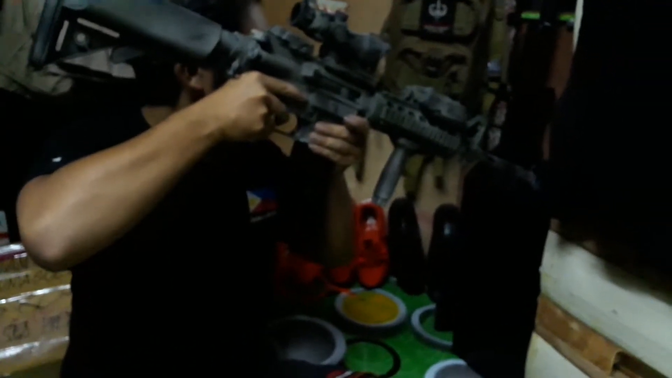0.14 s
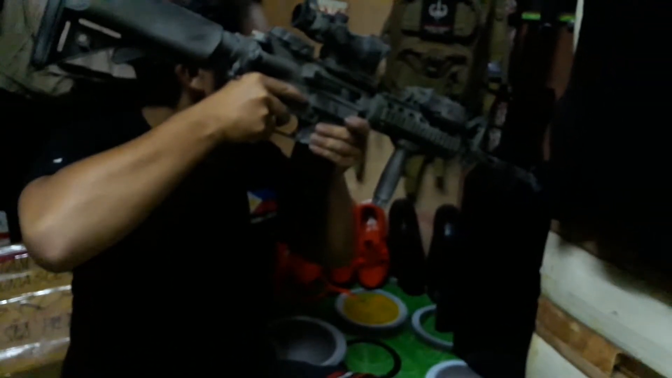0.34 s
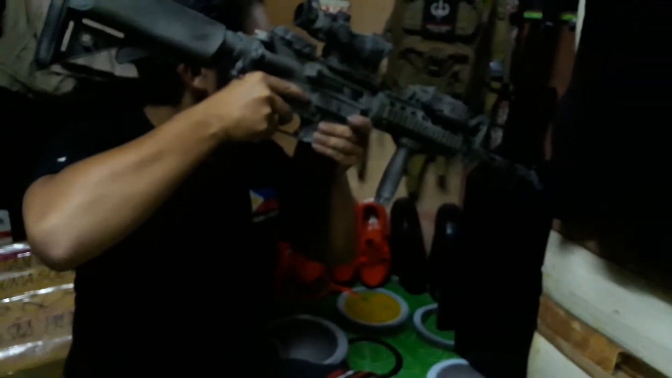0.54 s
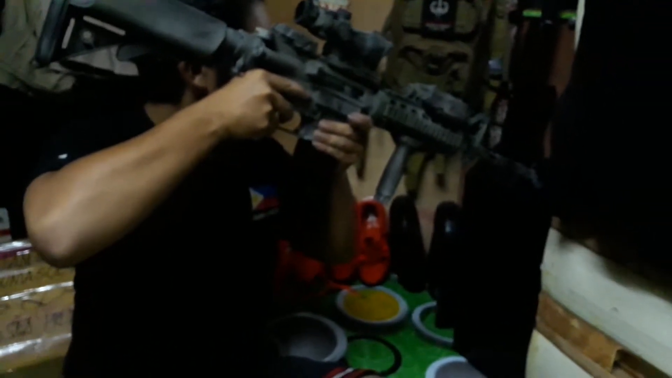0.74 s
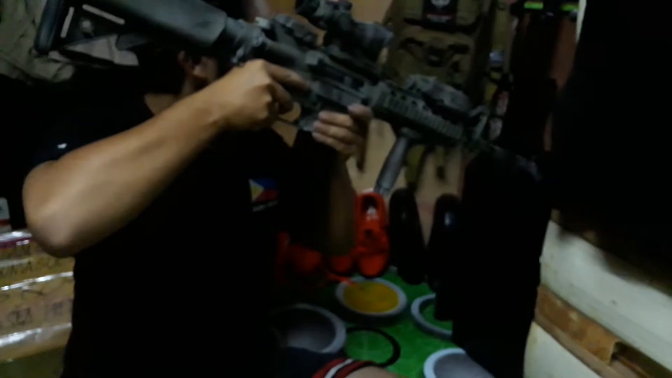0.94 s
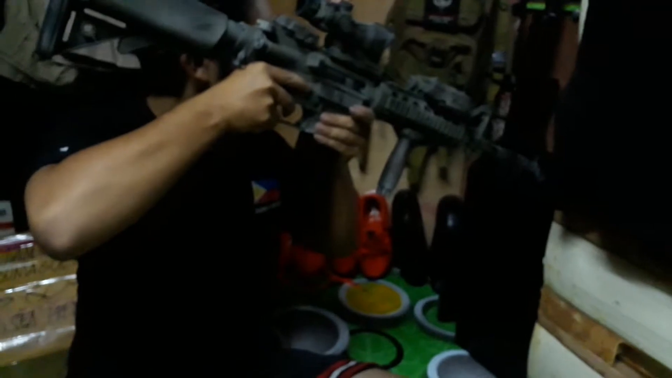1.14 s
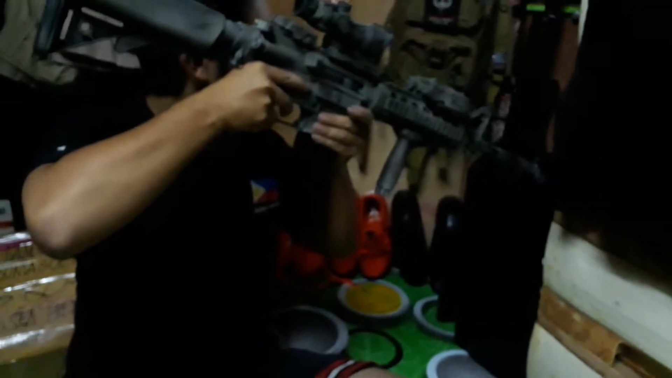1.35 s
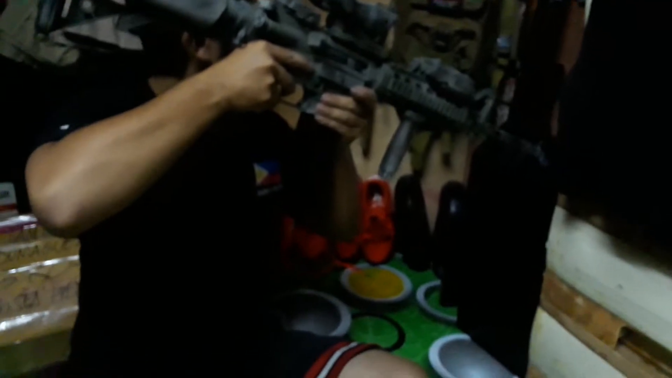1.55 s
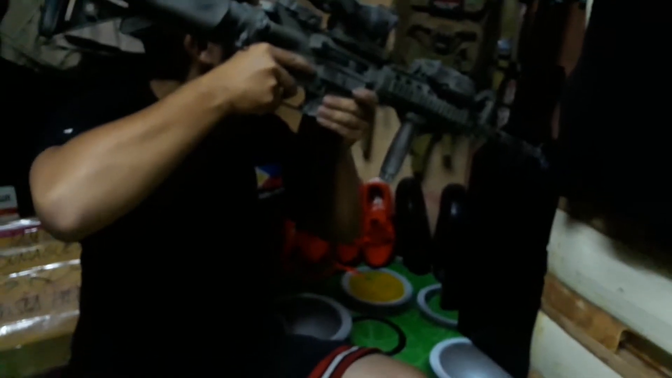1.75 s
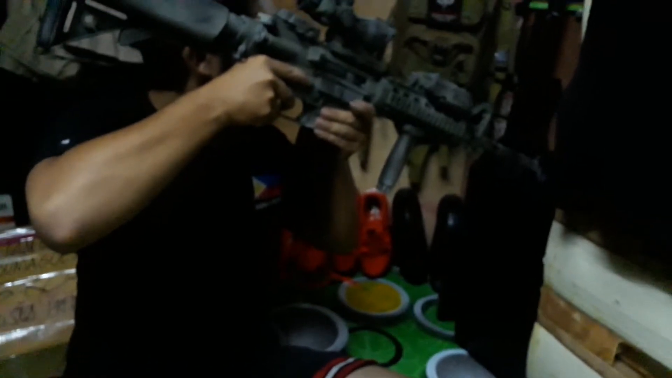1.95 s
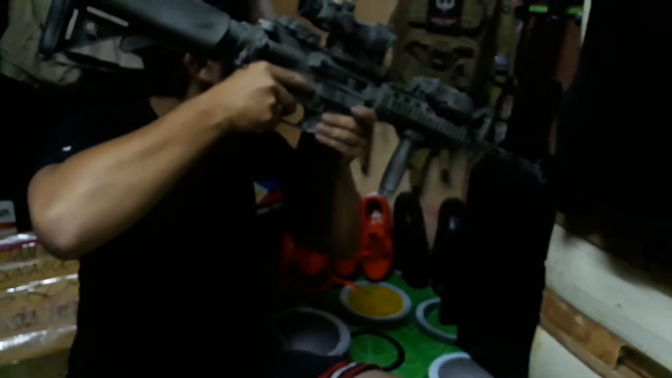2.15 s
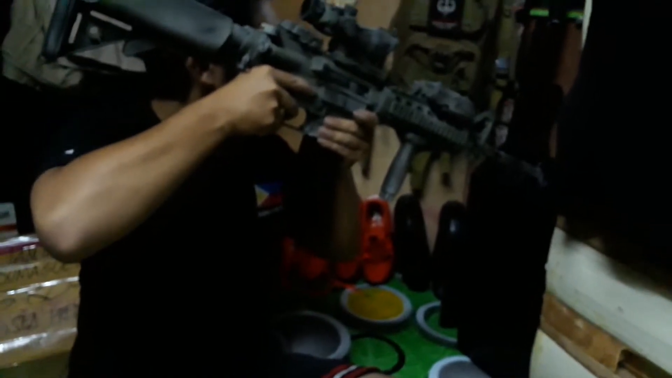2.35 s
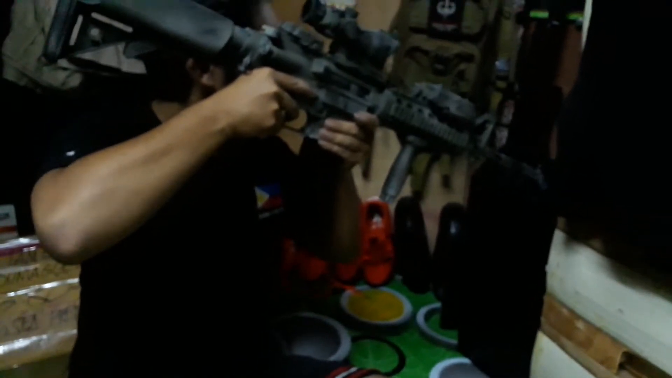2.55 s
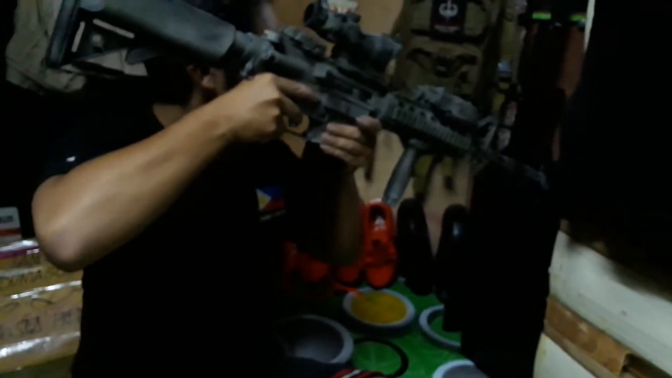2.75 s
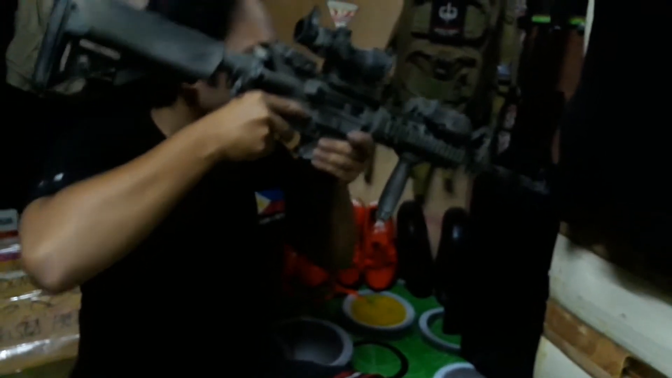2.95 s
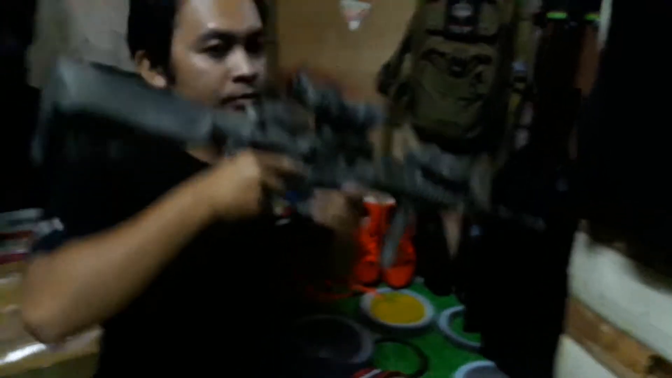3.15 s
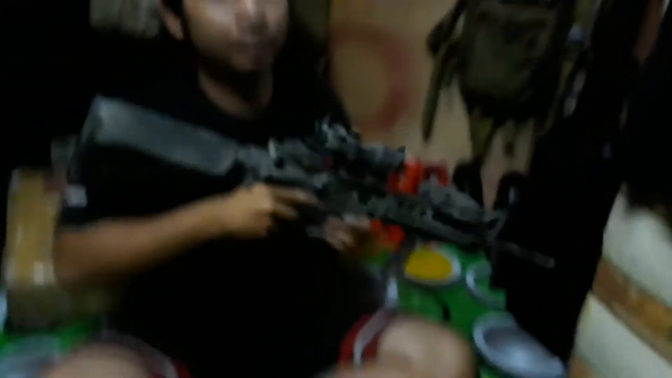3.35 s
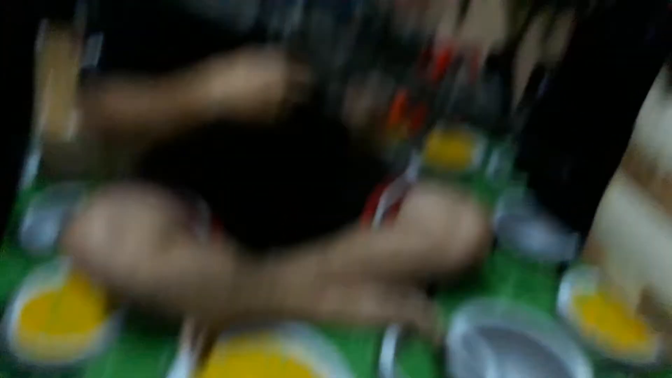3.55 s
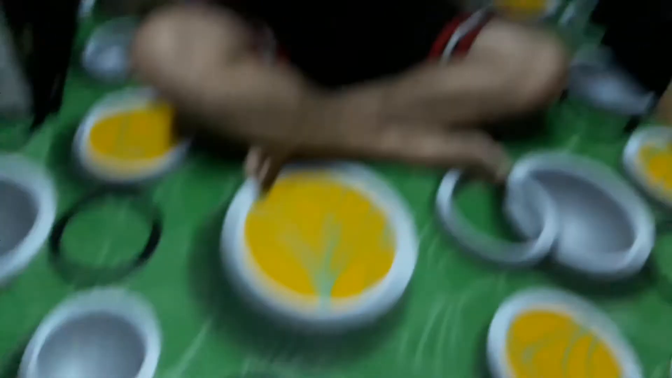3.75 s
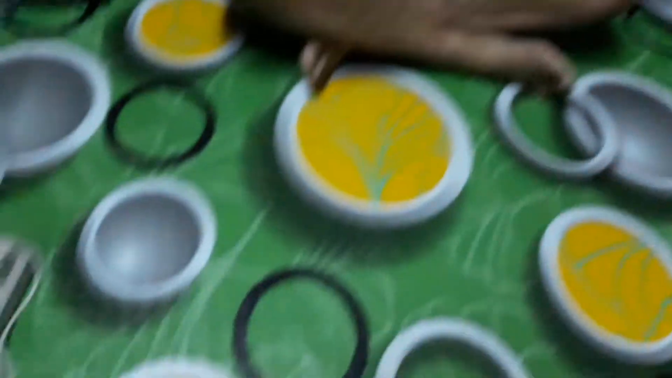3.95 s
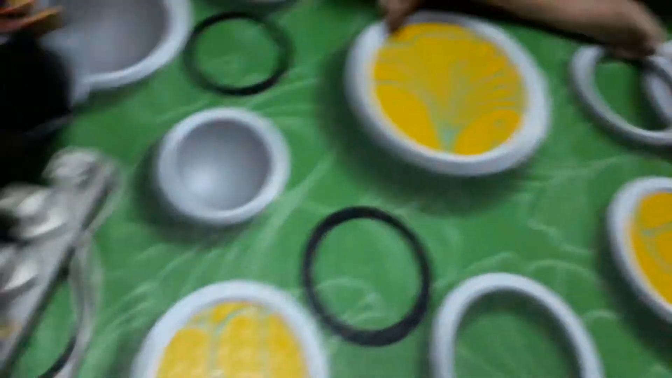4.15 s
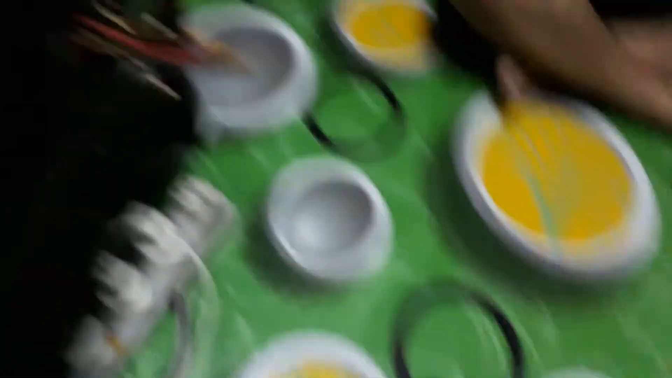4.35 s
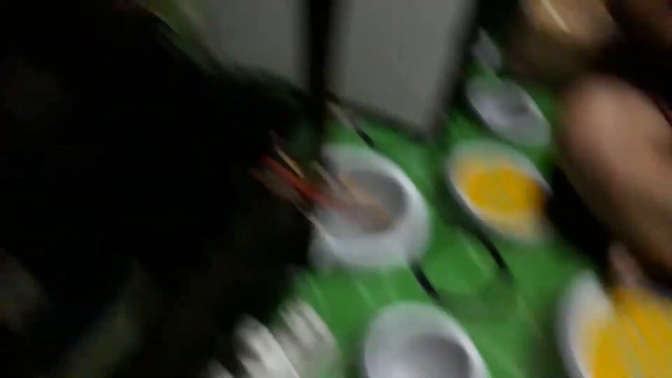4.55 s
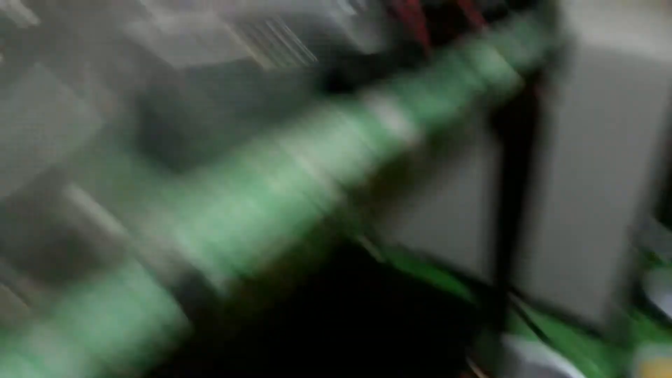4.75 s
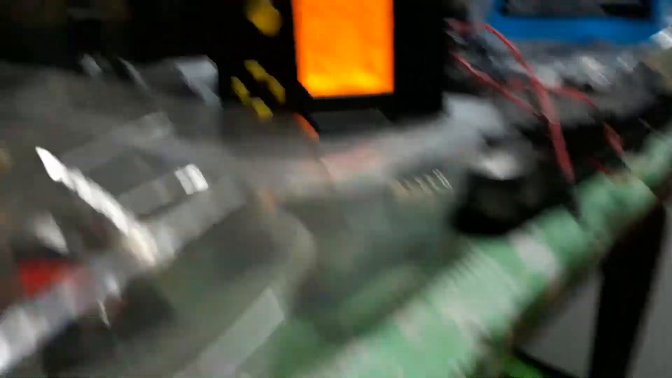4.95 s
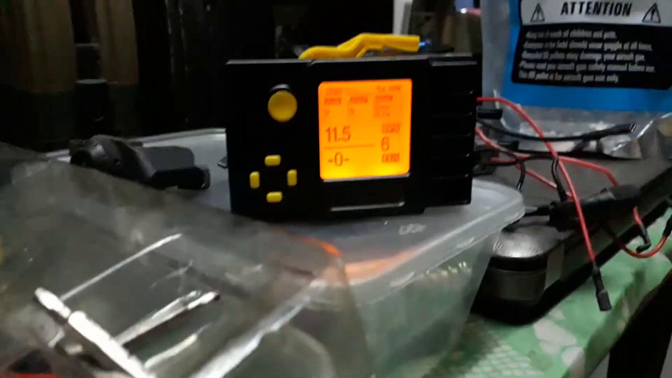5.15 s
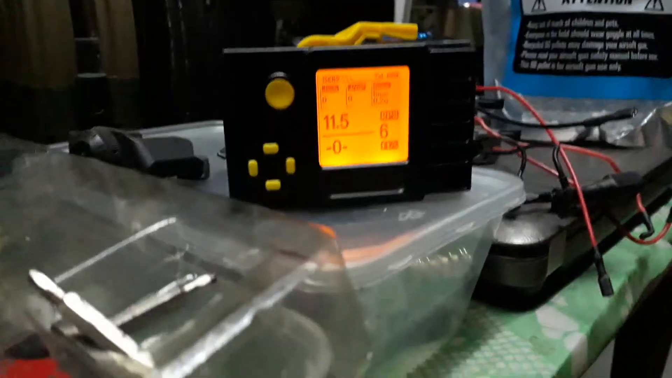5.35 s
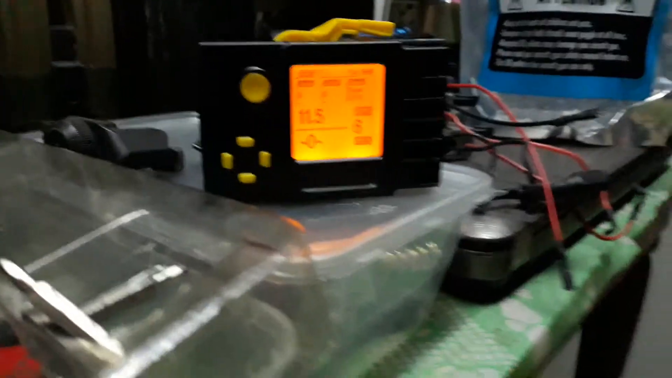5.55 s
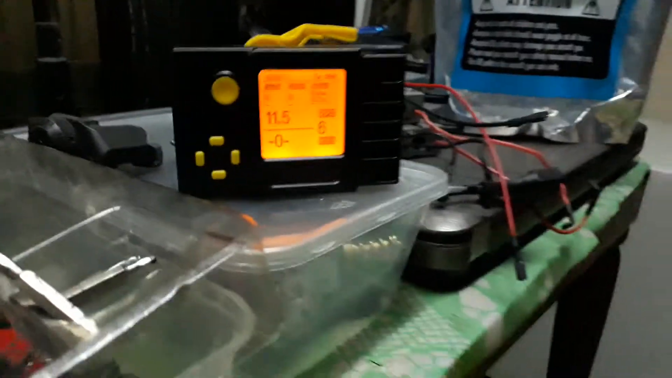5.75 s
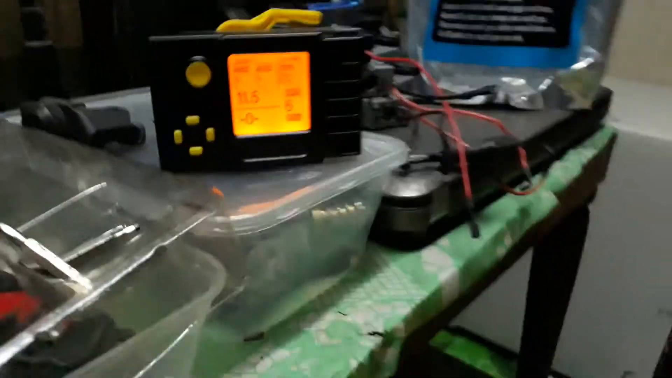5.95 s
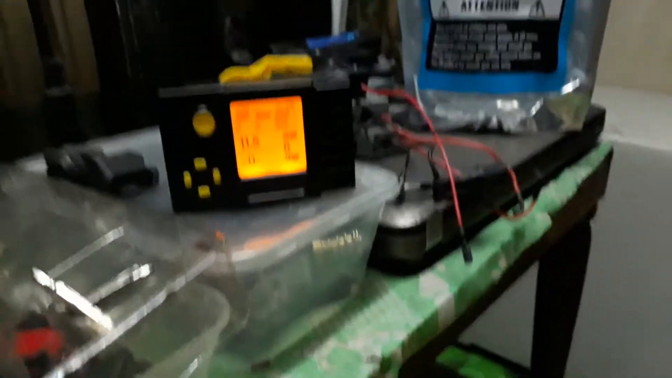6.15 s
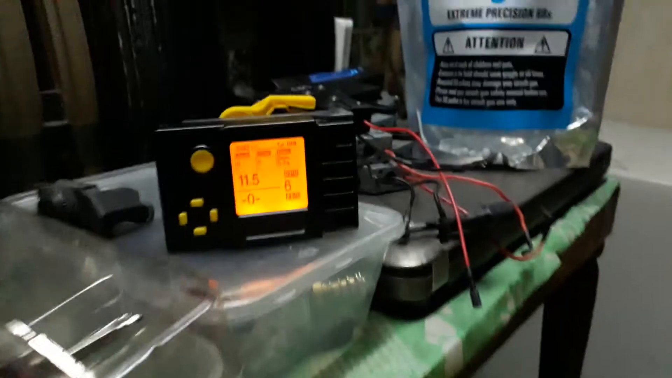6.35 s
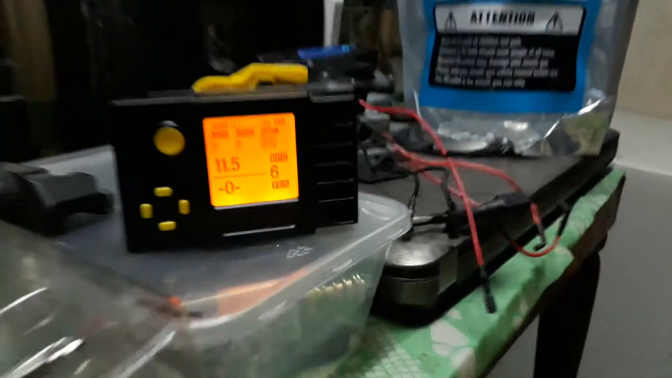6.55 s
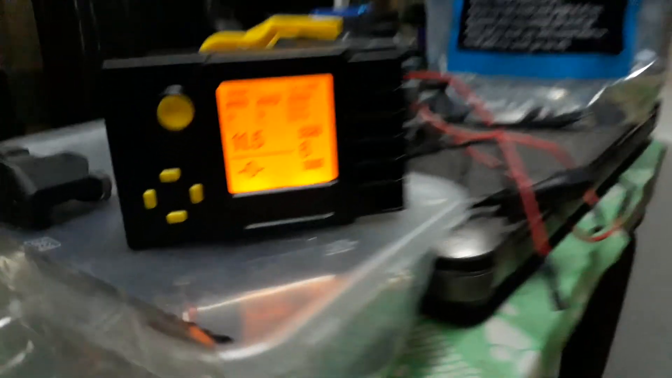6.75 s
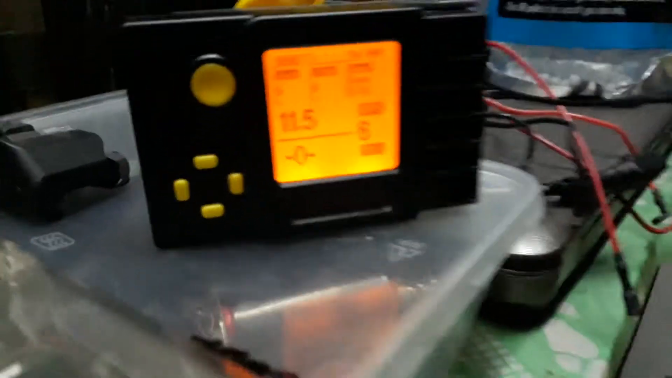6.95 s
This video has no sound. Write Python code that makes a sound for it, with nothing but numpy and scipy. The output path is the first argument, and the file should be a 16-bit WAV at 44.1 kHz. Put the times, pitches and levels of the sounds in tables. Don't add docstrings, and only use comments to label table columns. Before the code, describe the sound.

Whining gears and rapid piston slams come in two bursts, followed by small clatters, rubbing and hard knocks on the microphone, and a faint cricket.

```python
import sys
import numpy as np
from scipy import signal
from scipy.fft import rfft, irfft
from scipy.io import wavfile
from scipy.ndimage import uniform_filter1d

SR = 44100
rng = np.random.default_rng(int(sys.argv[2]) if len(sys.argv) > 2 else 0)


def log_audio(samples):
    frames = np.atleast_2d(samples).T
    limited = np.clip(frames, -1, 1)
    pcm = np.round(limited * 32767).astype(np.int16)
    wavfile.write(sys.argv[1], SR, pcm)


def invert_db(level):
    return 10 ** (np.asarray(level, dtype=float) / 20)


N = 308700

# start_s [s], thump_db [dB]
SHOTS = [(0.0, -8.5), (0.091, -8), (0.182, -6.5), (0.269, -5.5), (0.359, -6.5), (0.447, -5.5), (0.535, -5),
         (0.625, -10.5), (0.716, -7.5), (0.805, -6), (0.895, -7.5), (0.984, -6), (1.072, -5.5), (1.619, -3),
         (1.72, -3), (1.808, -8.5), (1.895, -8), (1.983, -6), (2.072, -6.5), (2.159, -3), (2.248, -2.5),
         (2.337, -4), (2.424, -11), (2.513, -5.5), (2.601, -4), (2.705, -2.5)]


def evened(x):
    return x / np.sqrt(np.mean(x ** 2) + 1e-20)


def read(points, hz):
    f, value = np.transpose(points)
    return np.interp(np.log(hz + 1), np.log(f + 1), value)


def add(mix, s, sound):
    part = mix[max(round(s * SR), 0):][:len(sound)]
    part += sound[:len(part)]


def colour(x, points):
    gain = invert_db(read(points, np.fft.rfftfreq(len(x), 1 / SR)))
    return evened(irfft(rfft(x) * gain, len(x)))


def band(x, lo_hz, hi_hz):
    edges_hz = [lo_hz, min(hi_hz, SR * .49)]
    return signal.sosfilt(signal.butter(3, edges_hz, "band", fs=SR, output="sos"), x)


def ring(x, modes):
    return sum(invert_db(db) * signal.lfilter(*signal.iirpeak(hz, hz / width, SR), x) for hz, width, db in modes)


def wobble(samples):
    once = uniform_filter1d(rng.standard_normal(N), int(samples))
    return evened(uniform_filter1d(once, int(samples)))


def burst(noise, start, length_s, rise_s=0.0001):
    t = np.arange(4000) / SR
    shape = np.exp(-t / length_s) * (1 - np.exp(-t / rise_s))
    puff = noise[int(start * (N - len(t))):][:len(t)] * shape
    return puff / abs(puff).max()


def gain_db():
    duck_db, hold_s, recover_db_per_s, open_db = -10, 0.55, 28, 3.6
    since_last = np.arange(N) / SR - SHOTS[-1][0]
    return np.clip(duck_db + recover_db_per_s * (since_last - hold_s), duck_db, open_db)


def background():
    # pitch_hz [Hz], level_db [dB per Hz]
    tone_spectrum = [(25, -2), (70, 0), (150, 2), (400, -7.5), (900, -14), (3000, -15.5), (5500, -25.5),
                     (7600, -35.5), (9000, -39.5), (11500, -27), (14500, -30.5), (15800, -30)]
    # pitch_hz [Hz], level_db [dB], chirp_depth_db [dB]
    cricket_settings = (6235, -57.5, 7.3)
    # pitch_hz [Hz], width_hz [Hz], level_db [dB]
    circuit = (14500, 120, -90)
    tone_db, rasp_width_hz, chirps_per_s, chirp_start = -67, 750, 7.78, .025
    hz, db, depth_db = cricket_settings
    wing = [(hz, rasp_width_hz, 0)]
    rasp = evened(ring(ring(ring(rng.standard_normal(N), wing), wing), wing))
    chirp = np.cos(2 * np.pi * (chirps_per_s * np.arange(N) / SR - chirp_start))
    swell_db = depth_db * (np.tanh(2.5 * chirp + .5) - 2.5) * .5
    cricket = invert_db(db + swell_db + 2.4 * wobble(500)) * rasp
    whistle = invert_db(circuit[-1]) * evened(ring(ring(rng.standard_normal(N), [circuit]), [circuit]))
    tone = invert_db(tone_db) * colour(rng.standard_normal(N), tone_spectrum)
    return invert_db(gain_db()) * (cricket + whistle + tone)


def hand():
    # start_s [s], end_s [s], rub_db [dB], brightness_db [dB], peak_share [share of slide]
    slides = [(3.448, 4.31, -62, -17, .9), (4.311, 4.574, -45.5, -7, 0.54), (4.57, 4.76, -68.5, 8, 0.56),
              (4.758, 5.04, -54.5, 1.5, 0.75), (5.02, 5.282, -53, -2, 0.8), (5.268, 5.45, -56, -38, 0.34),
              (5.703, 5.853, -54, -62, .9), (5.85, 6.09, -45, 0, 0.18), (6.153, 6.322, -69, 2, 0.9),
              (6.345, 6.483, -55, -0.5, 0.64), (6.48, 6.66, -69.5, 6, .3), (6.804, 7.0, -59.5, -7, 0.69)]
    # rub_db, rumble_db, hiss_db, scrape_db [dB]
    resting_db = (-76.5, -64, -83.5, -71.5)
    slide_start_db, slide_end_db, firm_db = -10.5, -16, -60
    rumble_firm_db, rumble_follows = -65.5, 0.86
    scrape_firm_db, scrape_follows, scrape_dull = -66.5, 1, 0.1
    power = invert_db(2 * (np.array(resting_db)[:, None] + gain_db()))
    for s, end, db, bright_db, share in slides:
        u = np.arange(0, 1, 1 / ((end - s) * SR))
        rub_db = db + np.interp(u, [0, np.clip(share, 0, 1), 1], [slide_start_db, 0, slide_end_db])
        rumble_db = rumble_firm_db + rumble_follows * (rub_db - firm_db)
        scrape_db = scrape_firm_db + scrape_follows * (rub_db - firm_db) - scrape_dull * bright_db
        for layer, layer_db in zip(power, (rub_db, rumble_db, rub_db + bright_db, scrape_db)):
            add(layer, s, invert_db(2 * layer_db))
    return np.sqrt(uniform_filter1d(power, size=300))


def rubbing(rumble):
    # pitch_hz [Hz], level_db [dB per Hz]
    rub_spectrum = [(290, -33), (500, -6.5), (799, 0), (1100, -5.5), (1430, -5.5), (1710, -8.5),
                    (1920, -9.5), (12000, -6), (15800, -16), (16500, -31.5)]
    rub_gain, rumble_gain, hiss_gain, scrape_gain = hand()
    grains = invert_db(2 * np.minimum(rng.exponential(1, N), 5) + 2.5 * wobble(100))
    rub = colour(rng.standard_normal(N) * grains, rub_spectrum)
    out = rub_gain * evened(band(rub, 1800, 5400)) + hiss_gain * evened(band(rub, 6500, 17000))
    out += scrape_gain * invert_db(1.4 * wobble(400)) * evened(band(rub, 320, 1800))
    return out + rumble_gain * invert_db(2.4 * wobble(550)) * rumble


def taps(tick, rumble):
    # start_s [s], level_db [dB], treble_db [dB against the tick]
    bumps = [(3.1071, -66, -3), (3.2283, -66, -8), (3.409, -58, -11.5), (4.325, -50, -2), (4.499, -39, 3),
             (4.7605, -42.5, 4), (4.804, -41.5, -5), (4.8662, -37, 0), (5.022, -37, 6.5), (5.036, -47, -1),
             (5.085, -37.5, 1), (5.1323, -39, -5), (5.314, -35.5, -1), (5.5587, -50, -10), (5.7032, -39, 8),
             (6.235, -58, 18.5), (6.632, -52.5, 14), (6.7231, -52, -4), (6.7524, -53.5, 9), (6.88, -58, 5)]
    # start_s [s], level_db [dB], treble_db [dB against the tick]
    snaps = [(3.87, -49, -13), (3.879, -46, -15), (4.314, -48, 14), (4.35, -55, -12), (4.394, -34.5, -3),
             (4.8968, -39, 10), (4.9317, -41, -9), (5.428, -38, -5), (5.599, -35.5, 2), (5.6184, -42.5, 0),
             (5.6384, -41, 9), (5.656, -41, 8), (5.7432, -35, 10.5), (5.758, -40, 10), (5.7722, -38, 8),
             (5.796, -39.5, 11), (5.814, -40, 10), (5.8417, -38, 9), (5.862, -35, 7), (6.275, -52, 15),
             (6.649, -53, 16), (6.8254, -45, 2), (6.836, -34.5, -21), (6.916, -45, 5), (6.937, -49, 7)]
    body, treble, thuds = np.zeros((3, N))
    ticks = [row + (0.5, .0065) for row in bumps] + [row + (-11, .0045) for row in snaps]
    for (s, db, treble_db, thud_db, length_s), start in zip(ticks, rng.random(len(ticks))):
        add(body, s, invert_db(db + 3.0) * burst(tick, start, length_s))
        add(treble, s, invert_db(db + treble_db - 1.5) * burst(tick, start, length_s))
        add(thuds, s, invert_db(db + thud_db) * burst(rumble, start, 0.008, 0.0017))
    return thuds + band(body, 910, 3800) + band(treble, 6800, 25000)


def microphone_blows(tick):
    # start_s [s], level_db [dB], sharpness_hz [Hz]
    nudges = [(3.107, -57, 300), (3.226, -53, 300), (3.268, -54.5, 300), (3.325, -57, 300)]
    # start_s [s], level_db [dB], sharpness_hz [Hz]
    knocks = [(4.445, -28, 500), (4.452, -32, 400), (4.5202, -24, 2500), (4.5218, -8, 2500),
              (4.5232, -8, 2200), (4.5239, -11, 2500), (4.5333, -18, 3000), (4.5375, -28, 3000),
              (4.5531, -9, 6000), (4.5545, 2, 2200), (4.5551, -2, 3000)]
    # start_s [s], level_db [dB rms], length_s [s]
    scratches = [(4.5, -42, .055), (4.5195, -36, .006), (4.533, -36, .0012), (4.5498, -33, .003),
                 (4.5525, -18, .004), (4.668, -32, .0012)]
    blows, grit = np.zeros((2, N))
    for s, db, sharp_hz in nudges + knocks:
        add(blows, s, -invert_db(db) * signal.windows.triang(int(SR / sharp_hz) + 1))
    for s, db, length_s in scratches:
        edge = signal.windows.tukey(int(length_s * SR), .4)
        add(grit, s, invert_db(db) * edge * tick[round(s * SR):][:len(edge)])
    return grit + blows - invert_db(10.5) * ring(blows, [(148, 76, 0)])


def handling():
    # pitch_hz [Hz], level_db [dB per Hz]
    tick_spectrum = [(410, -15), (700, 1), (6120, -1), (7170, -2.5), (7970, -4), (10700, -7.5), (14600, -8),
                     (16500, -22.5)]
    rumble_spectrum = [(25, -29.0), (70, -2.5), (140, -2), (350, -8.0), (700, -15.0), (2000, -46)]
    rumble = colour(rng.standard_normal(N), rumble_spectrum)
    tick = colour(rng.standard_normal(N), tick_spectrum)
    return rubbing(rumble) + taps(tick, rumble) + microphone_blows(tick)


def room(x):
    # pitch_hz [Hz], t60_s [s to fall 60 dB]
    decay = [(100, 0.047), (600, 0.21), (1200, 0.27), (3000, 0.21), (6000, .24), (12000, 0.2)]
    echoes = np.zeros(SR // 2)
    at = np.arange(200, len(echoes) - 20, 20)
    echoes[at + rng.integers(0, 20, len(at))] = rng.choice([-1., 1.], len(at))
    hz, t, z = signal.stft(echoes, SR, nperseg=256)
    tail = signal.istft(z * invert_db(-60 * t / read(decay, hz)[:, None]), SR, nperseg=256)[1]
    return signal.fftconvolve(x, tail / np.linalg.norm(tail))[:N]


def barrel():
    # start_s [s], level_db [dB], pitch_hz [Hz], t60_s [s]
    thin_ring = (2.8, -65, 3596, 1.1)
    s, db, hz, t60 = thin_ring
    t = np.maximum(np.arange(N) / SR - s, 0)
    return invert_db(db - 60 * t / t60) * np.sin(2 * np.pi * hz * t)


def pellet():
    # start_s [s], level_db [dB]
    bounces = [(3.969, -28), (3.982, -43), (4.0015, -36.5), (4.015, -42), (4.0304, -42), (4.0457, -41),
               (4.0632, -41), (4.084, -40), (4.108, -39), (4.135, -40), (4.176, -37.5), (4.2438, -34)]
    # pitch_hz [Hz], width_hz [Hz], level_db [dB]
    tray = [(4020, 900, 0.5), (5240, 630, 4), (6180, 680, -1)]
    clicks = np.zeros(N)
    for s, db in bounces:
        add(clicks, s, invert_db([db + 18.0]))
    return band(ring(ring(clicks, tray), tray), 2300, 7000)


def latch():
    # start_s [s], level_db [dB]
    strikes = [(1.2047, -13), (1.4494, -62), (1.487, -59), (1.494, -59), (2.811, -47), (2.878, -46),
               (2.891, -50.5), (2.9228, -48.5), (2.9587, -52), (2.994, -48.5), (3.262, -60.5),
               (3.4441, -50), (3.505, -37), (3.5154, -45), (3.5673, -49), (3.71, -48), (3.7694, -51)]
    # pitch_hz [Hz], width_hz [Hz], level_db [dB]
    receiver = [(1970, 2400, -15.5), (3420, 1700, -1.5), (4955, 3600, -6.5), (6360, 360, -10),
                (11400, 4800, -15.5)]
    noise, blows = evened(ring(rng.standard_normal(N), receiver)), np.zeros(N)
    for (s, db), start in zip(strikes, rng.random(len(strikes))):
        add(blows, s, invert_db(db + 3.5) * burst(noise, start, .005))
    return ring(blows, receiver)


def motor():
    # pull_s [s], release_s [s], lock_s [s]
    trigger = [
        (-.5, 1.121, 1.172),
        (1.585, 2.655, 2.818),
    ]
    # since_pull_s [s], level_db [dB against running], speed [relative, the last row is full speed]
    spin_up = [(0, -30.5, 0.37), (.01, -16.5, .5), (.014, -3.5, 0.68), (.027, 2, .8), (.077, 0, 0.79)]
    run_db, run_speed, run_down_s, creep_speed = -18.5, 1.0, .065, 0.068
    coast_s, coast_db_per_s, lock_db_per_s = 0.025, 139, 1102
    t = np.arange(N) / SR
    trigger_columns = np.transpose(trigger)
    pull, release, lock = trigger_columns[:, np.searchsorted(trigger_columns[0], t) - 1]
    s, up_db, up_speed = np.transpose(spin_up)
    fall_db = coast_db_per_s * np.maximum(t - release - coast_s, 0)
    fall_db += lock_db_per_s * np.maximum(t - lock, 0)
    level_db = np.maximum(run_db + np.interp(t - pull, s, up_db) - fall_db, -120)
    slowing = np.clip(1 - (t - release) / run_down_s, creep_speed, 1)
    return level_db, run_speed * np.interp(t - pull, s, up_speed / up_speed[-1]) * slowing


def gears():
    # [Hz, teeth meeting per second]
    stroke_curve = [(0, -3, 4700), (.016, -3.5, 5500), (.03, -1, 5650), (.042, 0, 5400), (.062, 0, 5000),
                    (.078, -1, 4650), (.086, -4, 4550)]
    # pitch_hz [Hz], width_hz [Hz], level_db [dB]
    gearbox = [(1256, 17, -5), (1660, 31, -22.5), (2194, 17, 1.5), (3360, 82, 3.5), (3432, 150, 1),
               (3598, 130, 6.5), (3880, 170, -0.5), (3954, 240, -8.5), (4160, 22, -17), (5380, 92, -6),
               (6200, 180, 1.5), (6870, 70, -2), (6330, 130, -23), (7130, 67, -19), (11170, 1900, -11)]
    # pitch_hz [Hz], width_hz [Hz], level_db [dB]
    whine_modes = [(2150, 200, 1), (3350, 260, 4), (4200, 600, -11), (5220, 260, -3.5)]
    # pitch_hz [Hz], level_db [dB per Hz]
    grind_spectrum = [(35, -68), (60, -44), (1030, -17), (1470, -21.5), (2140, -1.5), (2640, -13),
                      (3750, -1), (5340, -2), (8350, -20.5), (15000, -32), (16500, -36)]
    stroke_s, grind_repeats = .089, .6
    t, slam_s = np.arange(N) / SR, np.transpose(SHOTS)[0]
    latest = np.maximum(np.searchsorted(slam_s, t) - 1, 0)
    since = t - slam_s[latest]
    gap = np.diff(slam_s, append=slam_s[-1] + stroke_s)[latest]
    stroke = since * np.where(gap < 2 * stroke_s, stroke_s / gap, 1) % .45
    curve_s, curve_load, curve_hz = np.transpose(stroke_curve)
    load_db = np.interp(stroke, curve_s, curve_load)
    mesh_hz = np.interp(stroke, curve_s, curve_hz)
    level_db, speed = motor()

    turns = np.cumsum(mesh_hz * speed * (1 + .004 * wobble(60))) / SR
    whine_db = 3.5 * wobble(150) * speed ** 4 + 2 * load_db * speed ** 4
    whine = ring(invert_db(whine_db) * np.cos(2 * np.pi * turns), whine_modes)

    hits = invert_db(1.5 * np.minimum(rng.exponential(1, N), 4)) * rng.standard_normal(N) * (rng.random(N) < .3)
    place = (abs(since) * SR).astype(int)
    impacts = hits + .8 * hits[place]
    rack_teeth = invert_db(2.5 * np.cos(2 * np.pi * 122 * (since - .063)))
    shell = evened(ring(evened(impacts) * rack_teeth, gearbox))

    grit = rng.standard_normal(N)
    grind = colour(grit + grind_repeats * grit[place], grind_spectrum)
    return invert_db(level_db + load_db + 0.41 * wobble(150)) * (shell + whine + grind)


def slams():
    # delay_s [s after the slam], size [share, minus pulls back], length_s [s]
    air_pushes = [
        (.0013, 0.4, 0.0009),
        (.003, -0.75, 0.001),
        (.0037, 0.75, 0.0017),
        (.0085, 0.2, 0.0009),
    ]
    # pitch_hz [Hz], width_hz [Hz], level_db [dB]
    cylinder = [(139.6, 52, -7), (477, 110, -17.5), (785, 83, -7)]
    # pitch_hz [Hz], level_db [dB]
    crack_spectrum = [(200, -28.5), (700, -7), (1500, -4), (2500, -5), (4300, -11.5), (5300, 1.5),
                      (7000, 3), (8000, -7), (12000, -7.5), (16000, -18)]
    # pitch_hz [Hz], width_hz [Hz], level_db [dB]
    hollow = (600, 90, -4)
    usual_crack_db, crack_spread_db, crack_fresh = -16.5, -1.5, .6
    pushes, cracks = np.zeros((2, N))
    noise = colour(rng.standard_normal(N), crack_spectrum)
    for (s, db), luck in zip(SHOTS, rng.random((len(SHOTS), 2 + 2 * len(air_pushes)))):
        for (delay, size, length_s), chance, late in zip(air_pushes, luck[2::2], luck[3::2]):
            push = signal.windows.hann(int(length_s * SR) + 2)
            at = s + delay + .0003 * (late - .5)
            add(pushes, at, invert_db(db + 6.2 * (chance - 1.5)) * size * push)
        crack_db = usual_crack_db + crack_spread_db * (luck[0] - .5)
        crack = burst(noise, 0, 0.022) + crack_fresh * burst(noise, luck[0], 0.013)
        add(cracks, s + 0.0012, invert_db(crack_db + 12.5) * crack)
        add(cracks, s + .0012, invert_db(crack_db + 9.5) * burst(noise, 0.17, 0.0011))
        add(cracks, s + 0.0066, invert_db(crack_db + 7.0) * burst(noise, luck[1], 0.0039))
    thump = invert_db(4) * pushes + invert_db(14.5) * ring(pushes, cylinder)
    return band(thump - ring(thump, [hollow]), 63, 7600) + cracks


def scene():
    rifle = gears() + slams() + latch() + pellet() + barrel()
    return (rifle + invert_db(-14) * room(rifle) + handling() + background())[None]


def roll_off(x):
    return signal.sosfilt(signal.butter(12, 16890, fs=SR, output="sos"), x)


def record(dry):
    # low_hz, high_hz [Hz]
    mic_hz = (60, 16000)
    low_cut = signal.lfilter(*signal.butter(2, mic_hz[0], "high", fs=SR), dry)
    high_cut = signal.firwin(301, mic_hz[1], window=("kaiser", 8), fs=SR)
    edged = signal.oaconvolve(low_cut, high_cut[None], "same")
    return roll_off(np.tanh(edged * 1.06))


dry = scene()
out = record(dry)
log_audio(out)
```